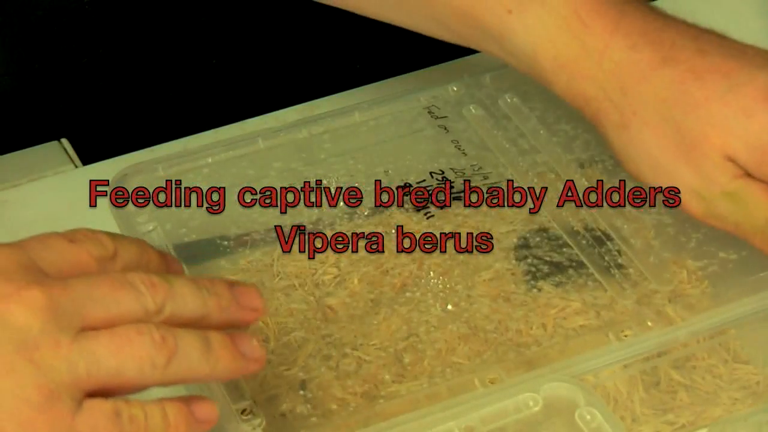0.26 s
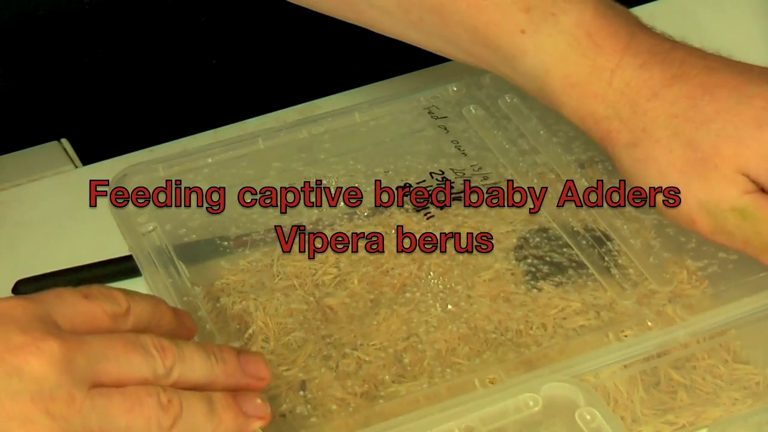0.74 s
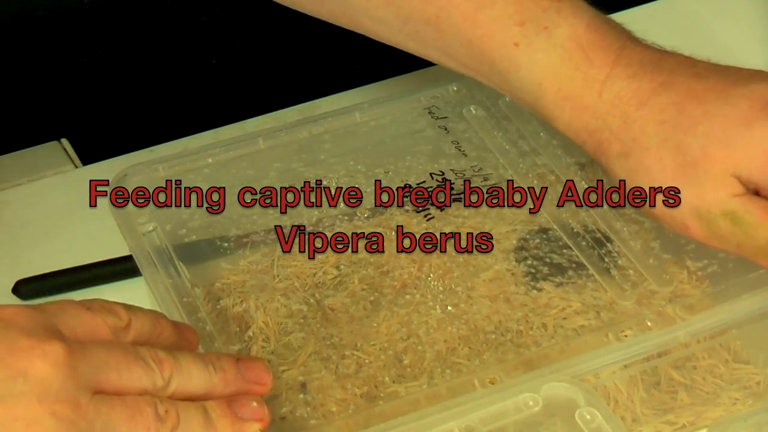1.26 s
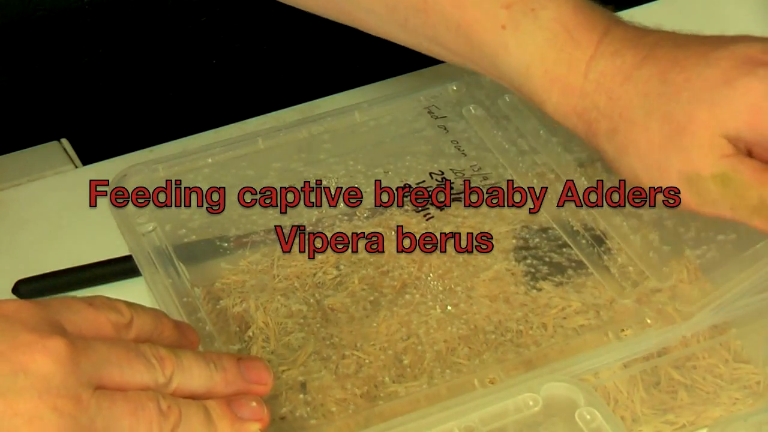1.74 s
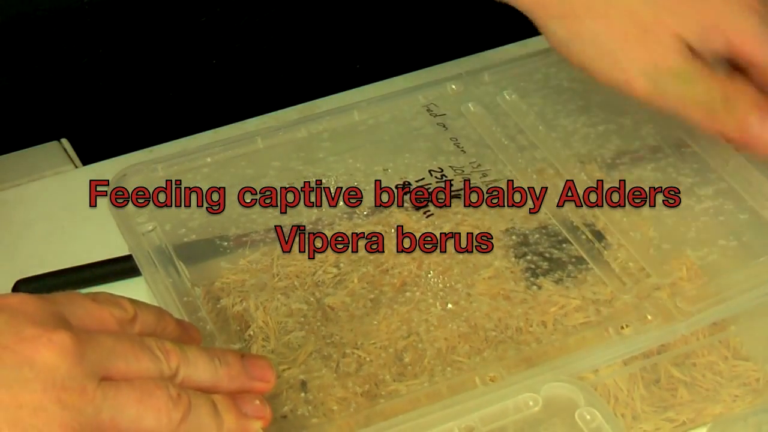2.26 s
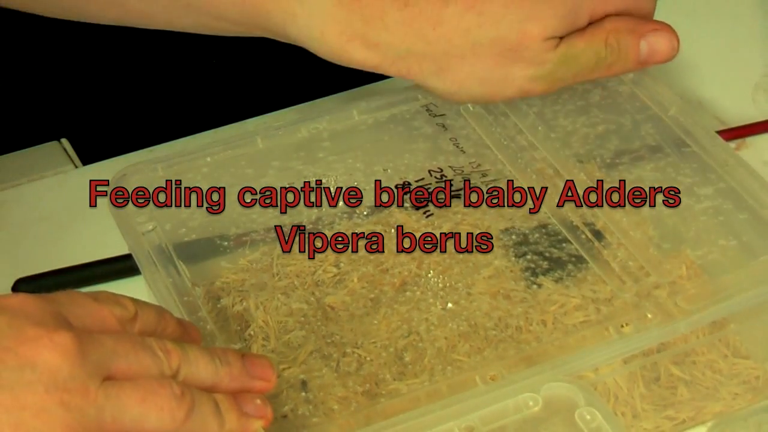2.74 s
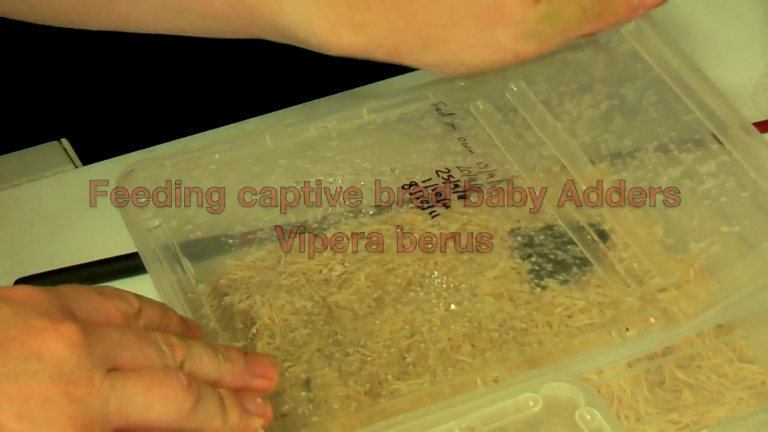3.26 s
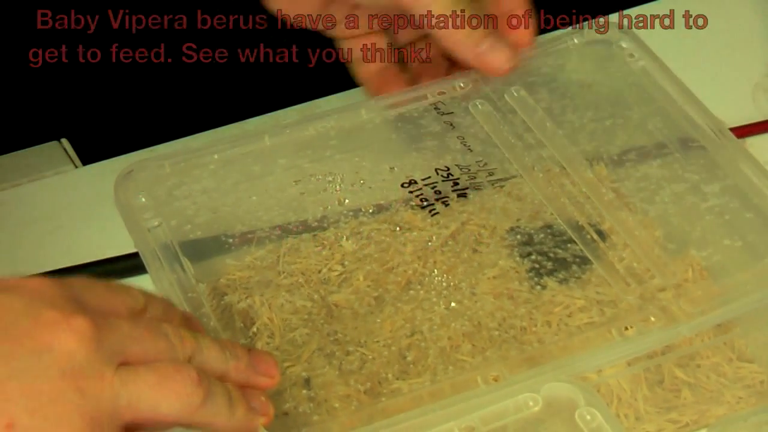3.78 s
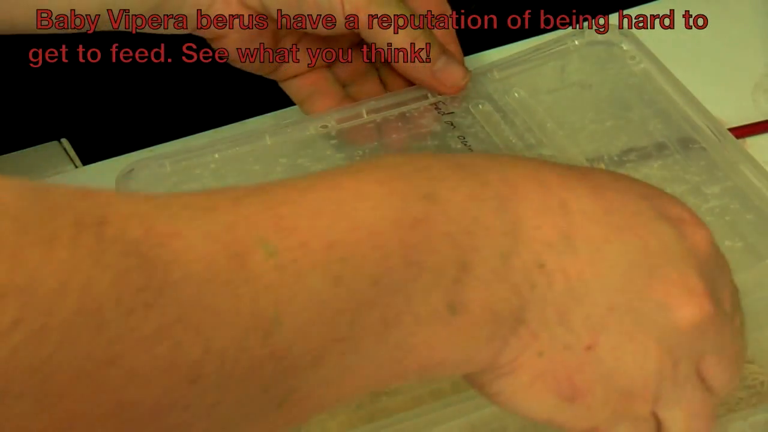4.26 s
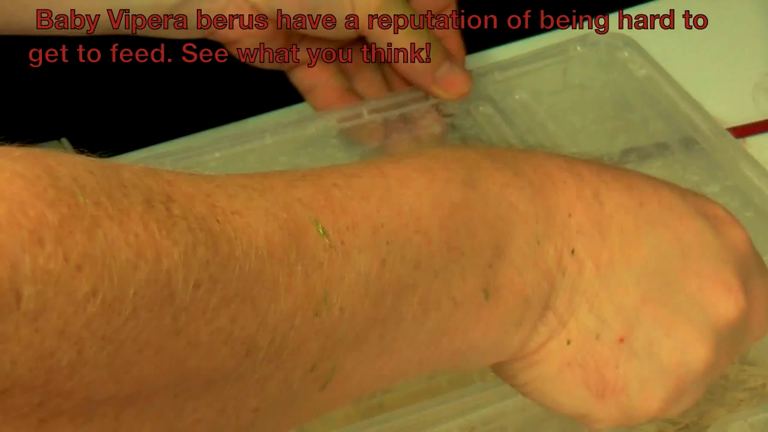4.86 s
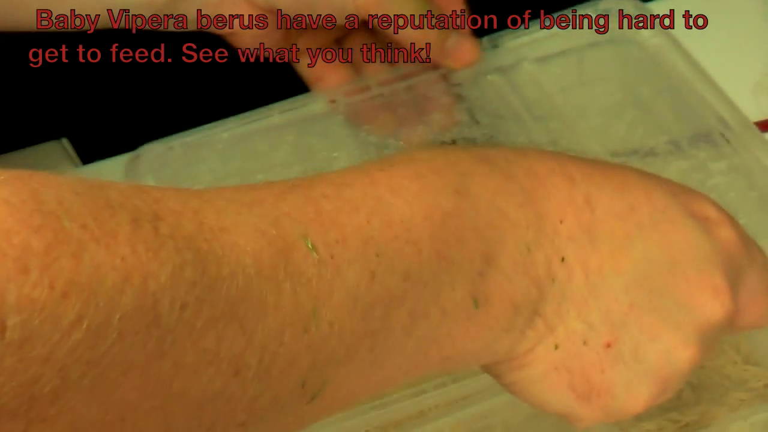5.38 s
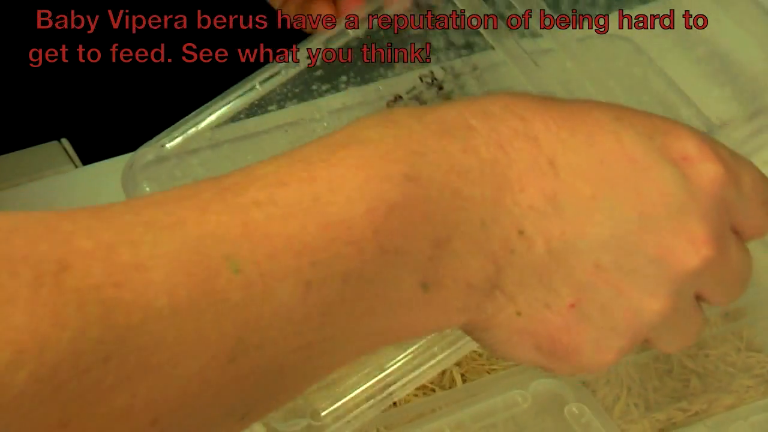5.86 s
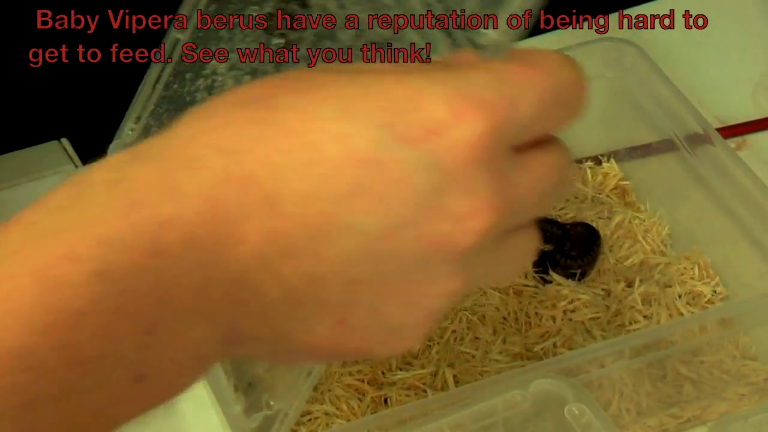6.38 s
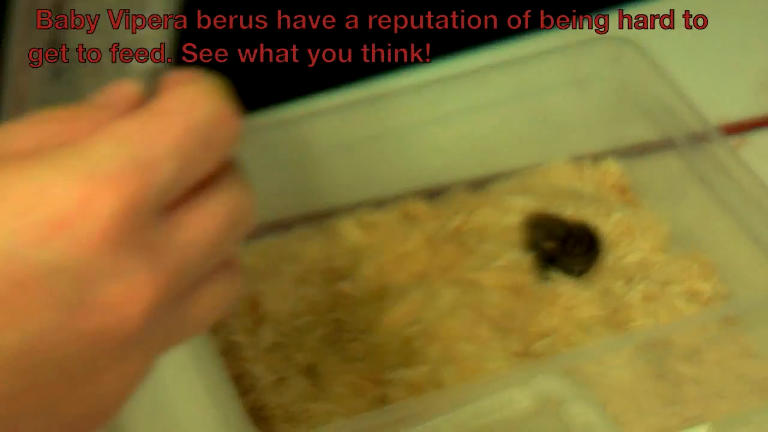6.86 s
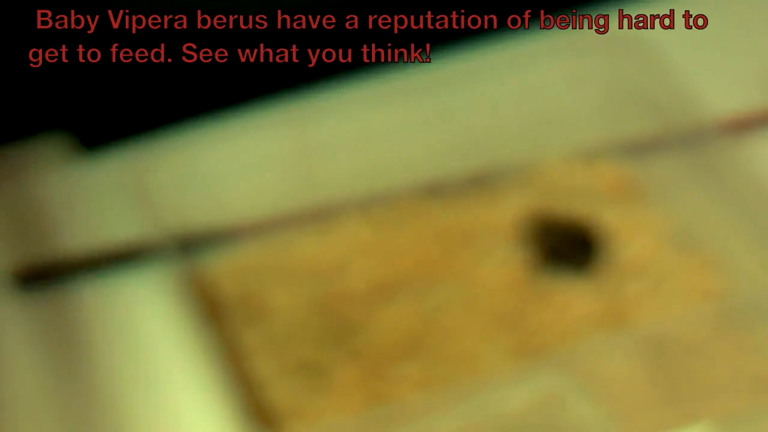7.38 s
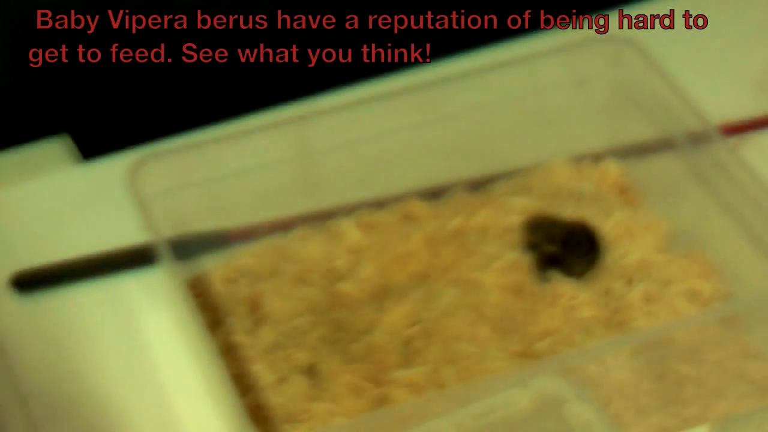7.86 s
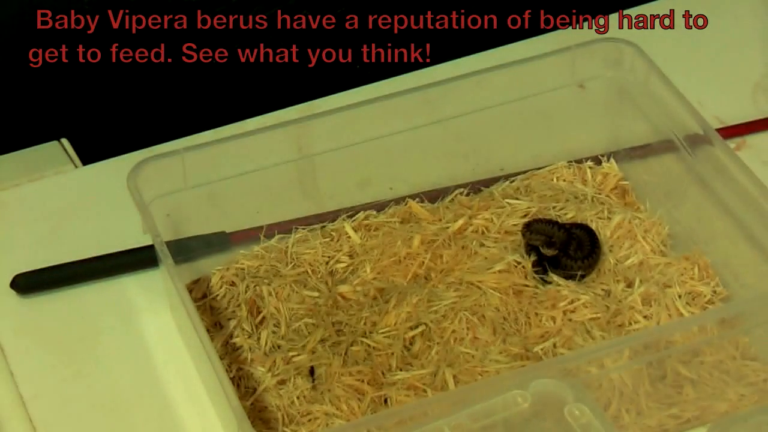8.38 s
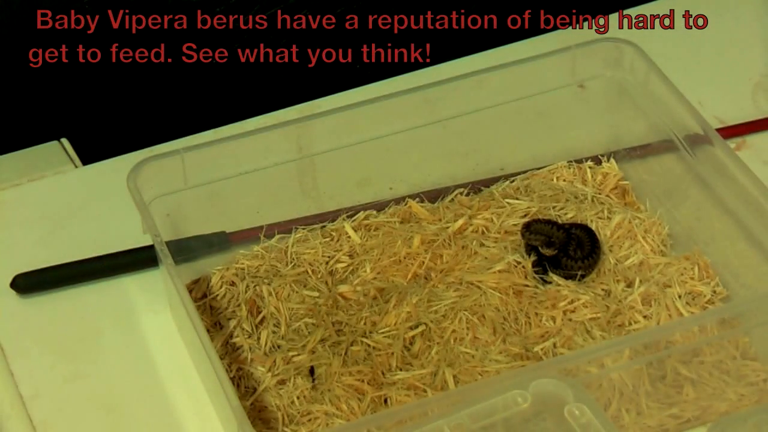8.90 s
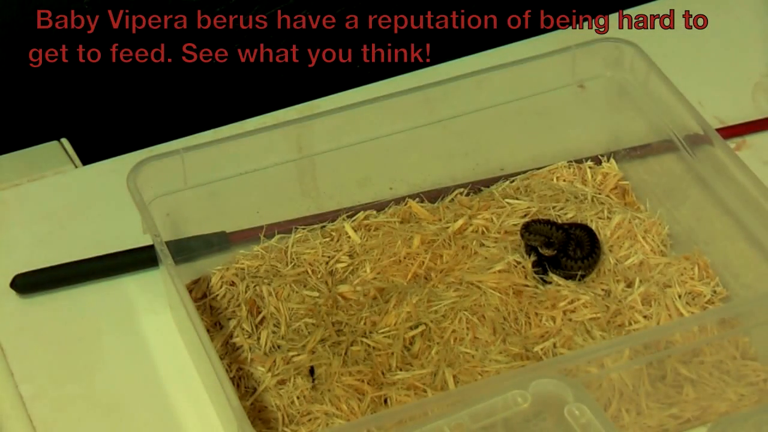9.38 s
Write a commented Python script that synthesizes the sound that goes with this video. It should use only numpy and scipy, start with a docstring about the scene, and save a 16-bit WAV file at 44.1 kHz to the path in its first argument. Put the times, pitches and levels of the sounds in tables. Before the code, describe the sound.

In a small room, a nearby single-channel microphone catches a thin hollow plastic tub over soft fan air with hum, steady hiss, a faint high electrical whine and a small motor whirr that comes and goes. At about 1.1 s a firm hollow knock sounds, followed by clacks near 1.3 s. Lighter bumps and short rubbing scrapes continue from 1.7 to 4 s, with a brighter knock at 2.9 s. Small taps lead to a loud double clack around 5.2 s as the lid loosens, then softer knocks, scrapes and a snap until 6.5 s. From 6.6 to 8.4 s only faint ticks and grazes stand out while the whirr rises. At 8.45 s sharp clacks begin, strongest near 8.7 s, as the lid is set down; from 8.9 s it rocks in quick weakening bumps until about 9.2 s, leaving the background.

```python
"""A catch snaps and a hollow plastic tub knocks: hands work the lid off a thin storage tub in a small room,
lift it away and set it down, where it rocks to rest. Blows ring panel, walls and rim through decaying modes and
shaped noise; fingers and rim scrape as dense tiny slips through the same colours. Near reflections and a short
tail carry the handling. Behind lie fan noise with its hum, a steady hiss that wanders a little in level, a thin
electrical whine, and a faint whirr, as of a lens motor, that comes and goes."""
import sys
import numpy as np
from scipy import signal
from scipy.fft import rfft, irfft
from scipy.io import wavfile
from scipy.ndimage import uniform_filter1d

SR = 44100
rng = np.random.default_rng(int(sys.argv[2]) if len(sys.argv) > 2 else 0)


def int16_out(signal):
    """Quantize to a 16-bit WAV file."""
    q = np.round(np.clip(np.atleast_2d(signal).T, -1, 1) * 32767)
    wavfile.write(sys.argv[1], SR, q.astype(np.int16))


N = 425124
TIME = np.arange(N) / SR  # seconds

# Blows on lid and tub, levels ahead of the handling trim: start_s, thump_db (hollow), clack_db (walls),
# crack_db (sharp edge), thump_hz, clack_hz, square (0 = a glancing swish, 1 = a full crack)
BLOWS = [(.027, -37.5, -52, -63, 443, 1030, 0.34), (1.090, -16.5, -31.5, -38, 470, 1250, .6),
         (1.288, -32, -36.5, -42, 380, 1630, 0.72), (1.32, -28.5, -31.5, -42, 544, 1610, 0.36),
         (1.85, -42, -49.5, -59, 528, 1390, .5), (2.141, -41.5, -41, -56, 415, 1310, .2),
         (2.752, -39.5, -49.5, -61, 510, 1190, 0.35), (2.905, -26.5, -29.5, -33, 412, 1880, 0.16),
         (3.150, -32, -37, -46, 460, 1180, 0), (3.966, -34, -47.5, -63, 426, 1350, .5),
         (4.374, -45, -56, -52, 400, 2800, 0.41), (4.675, -34, -49, -66, 403, 1170, .2),
         (4.727, -42, -56, -75, 255, 1110, .2), (5.144, -19, -36.5, -40.5, 458, 1370, 0.092),
         (5.199, -21, -22, -32.5, 737, 940, 0), (5.206, -17.5, -38, -48, 395, 1410, .3),
         (5.388, -36.5, -39, -47, 480, 3170, 0.089), (5.418, -39, -51, -56, 496, 1430, 0.23),
         (5.486, -39.5, -49.5, -60, 488, 1090, 0), (5.811, -48, -47, -59, 530, 1410, .1),
         (6.028, -31, -40.5, -53, 588, 1070, 0), (6.104, -31, -40.5, -59, 506, 1090, 0.18),
         (6.249, -38.5, -52.5, -62, 496, 1030, 0.22), (6.388, -29.5, -43, -59, 520, 1160, .3),
         (6.444, -32, -30.5, -38.5, 562, 1080, 0.84), (8.450, -26.5, -28, -39, 472, 1390, 0.89),
         (8.613, -33.5, -42, -44.5, 590, 1240, 1), (8.6954, -16, -30, -26.5, 444, 1890, 0.39),
         (8.7542, -19.5, -33, -30, 436, 1310, 0.25), (8.966, -24, -37.5, -57, 446, 840, .2),
         (9.035, -45, -46.5, -51, 463, 2750, 0.83), (9.067, -29.5, -44, -56, 462, 910, 0.42),
         (9.092, -38, -40.5, -53, 395, 990, 0.78)]


def knocks(colours, trim_db=-1):
    """Every snap and bump of lid and tub, each a short contact that excites panel, walls and edge."""
    out = np.zeros(N)
    for row in BLOWS + rocking():
        add(out, row[0], knock(row, colours))
    return amp(trim_db) * out


def knock(row, colours, swing_s=0.0025, lowest_hz=245, ring_db=-21, rattle_db=-10, clack_t60=0.088,
          flex_db=7, flex_q=7, crack_t60=0.042, tick=14.0, chatter_db=-17, hard_s=0.00077):
    """One blow: the panel heaves and rings the tub, while the rim chatters against the walls."""
    # modes of the hollow tub: pitch_hz (each blow detunes it slightly), level_db, t60_s
    tub_modes = [(259, -4, 0.12), (314, -14, 0.25), (380, -14, 0.16), (426.7, -1, 0.12), (461, 2, 0.1),
                 (549, 0.5, 0.31), (676, -4.5, 0.14)]
    # a blow whose crack is as strong as its thump has the briefest contact; duller blows stay longer
    contact_s, duller_db_per_doubling = 0.00045, 16.5
    rebound_s, rebound_db, rebound_pitch = 0.00957, -6, 0.787  # pitch as a share of the first swing's
    lid_free_s, lid_lowest_hz = 7.0, 304  # once off the tub, the lid alone has still less bass

    s, thump_db, clack_db, crack_db, thump_hz, clack_hz, square = row
    hollow, clack, swish, crack = colours
    t = np.arange(SR // 2) / SR
    contact = contact_s * 2 ** ((thump_db - crack_db) / duller_db_per_doubling)
    onset = 1 - np.exp(-(t / contact) ** 2)
    low, mid, high = rng.standard_normal((3, len(t)))

    # the panel swings and springs back once, weaker and lower
    panel = swing(t, thump_hz, swing_s)
    panel = panel + amp(rebound_db) * swing(t - rebound_s, rebound_pitch * thump_hz, swing_s)
    # the tub modes near the panel's pitch ring on
    ring = 0
    for mode_hz, mode_db, t60 in tub_modes:
        detuned_hz = mode_hz * (1 + 0.0097 * rng.standard_normal())
        nearness = 1 / (1 + (np.log(mode_hz / thump_hz) / .5) ** 2)
        ring = ring + amp(mode_db) * nearness * dying(t, t60) * np.sin(2 * np.pi * detuned_hz * t)
    # so small a box radiates hardly any bass
    heave = struck(band(onset * (panel + amp(ring_db) * ring), lowest_hz, "highpass", order=4))
    rattle = struck(through(low * onset * dying(t, 0.16), hollow))
    thump = struck(heave + amp(rattle_db) * rattle)
    if s > lid_free_s:
        thump = struck(band(thump, lid_lowest_hz, "highpass", order=4))

    # the bare tick at the start is strong only for a hard, brief contact
    hardness = 1 / (1 + (contact / hard_s) ** 2)
    snap = (t == 0) * tick * hardness
    walls = through(snap + mid * onset * dying(t, clack_t60), clack)
    walls = struck(flex(walls, clack_hz, flex_db, flex_q))

    # square blows crack across the treble, glancing ones graze with a thin swish
    square = np.clip(square, 0, 1)
    chatter_fade = dying(t, crack_t60) + amp(chatter_db) * dying(t, 0.17)
    chatter = snap + high * onset * chatter_fade
    edge = struck(through(chatter, square * crack + (1 - square) * swish))
    return amp(thump_db) * thump + amp(clack_db) * walls + amp(crack_db) * edge


def swing(t, hz, swing_s):
    """The panel swings up for a few cycles from t = 0 and dies away in two heaving modes."""
    # panel modes: multiple of the thump pitch, level_db, t60_s
    panel_modes = [(1, 1.5, 0.032), (.72, -12.5, 0.038)]
    t = np.maximum(t, 0)
    modes = sum(amp(db) * np.sin(2 * np.pi * k * hz * t) * dying(t, t60) for k, db, t60 in panel_modes)
    return modes * (1 - np.exp(-t / swing_s))


def rocking(count=9):
    """The lid, once set down, rocks to rest in soft bumps that grow weaker and lower."""
    start_s, gap_s, jitter_s = 8.887, 0.034, 0.00293
    first_db, fade_db_per_s = -30.5, 50
    first_hz, sag_hz_per_s = 458, 350
    clack_db, crack_db, clack_hz = -21, -39, 950  # the two levels count from the thump
    since = gap_s * np.arange(count) + jitter_s * rng.standard_normal(count)
    bumps = []
    for t in since:
        db = first_db - fade_db_per_s * t
        hz = first_hz - sag_hz_per_s * t
        bumps.append((start_s + t, db, db + clack_db, db + crack_db, hz, clack_hz, 0))
    return bumps


def scrapes(colours, trim_db=-1, flex_db=8, flex_q=4, lowest_hz=1250, highest_hz=3000):
    """Sliding skin and rim drive the same hollow, walls and edges as the blows."""
    # a stroke that hisses as much as it rasps flexes the wall at rasp_hz; duller strokes flex it lower
    rasp_hz, rasp_db_per_octave = 2450, 11
    rise_share = 0.36  # part of a stroke in which the pressure builds
    hollow, walls, hiss = (unit(through(friction(), c)) for c in colours)
    out = np.zeros(N)
    for s, length, hollow_db, wall_db, hiss_db in strokes():
        near = abs(TIME - s) < 3 * length
        t = TIME[near] - s
        width = length * np.where(t < 0, rise_share, 1 - rise_share)
        pressure = np.exp(-.5 * (t / width) ** 2)
        wall_hz = rasp_hz * 2 ** ((hiss_db - wall_db) / rasp_db_per_octave)
        wall_hz = np.clip(wall_hz, lowest_hz, highest_hz)
        rasp = unit(flex(walls[near], wall_hz, flex_db, flex_q))
        rub = amp(hollow_db) * hollow[near] + amp(wall_db) * rasp + amp(hiss_db) * hiss[near]
        out[near] += pressure * rub
    return amp(trim_db) * out


def strokes():
    """All sliding contacts: scrapes, light ticks and grazes, and the loose lid's buzz after each tabled blow."""
    # skin and rim sliding over the tub, ahead of the trim: peak_s, length_s, hollow_db, wall_db, hiss_db
    slides = [(1.273, .042, -41, -55, -70), (1.36, 0.055, -56, -56, -77),
              (1.675, .075, -37.5, -42.5, -45.5), (2.07, 0.042, -44.5, -54, -51.5),
              (2.18, 0.042, -46, -48.5, -58), (2.54, 0.059, -60, -55, -59), (2.885, .033, -42, -59, -73),
              (3.16, 0.05, -35, -48.5, -43.5), (3.325, 0.13, -49.5, -60, -60.5),
              (3.53, 0.098, -47, -45.5, -60), (3.653, 0.044, -40.5, -39.5, -54),
              (3.74, 0.17, -53, -58, -57), (4.65, 0.026, -41.5, -60, -77), (5.03, 0.27, -49.5, -78, -86),
              (5.728, 0.03, -42, -48.5, -45.5), (5.85, 0.066, -43.5, -54, -80),
              (9.005, 0.055, -41, -43, -62)]
    # light ticks at the rim and fingertip grazes on the lid, nearly all hiss, ahead of the trim:
    # peak_s, length_s, hiss_db
    light_contacts = [(6.087, .01, -47), (6.168, 0.011, -51), (7.207, 0.034, -52.5), (7.709, 0.013, -49),
                      (7.798, 0.038, -51), (7.88, 0.028, -60), (8.054, 0.037, -52)]
    light_hollow_db, light_wall_db = -12, -12  # relative to the hiss
    buzz_delay_s, buzz_length_s = 0.024, 0.057
    # relative to the blow's thump, clack and crack
    buzz_hollow_db, buzz_wall_db, buzz_hiss_db = -24, -18.5, -25.5
    light = [(s, length, db + light_hollow_db, db + light_wall_db, db) for s, length, db in light_contacts]
    buzzes = [(s + buzz_delay_s, buzz_length_s,
               thump + buzz_hollow_db, clack + buzz_wall_db, crack + buzz_hiss_db)
              for s, thump, clack, crack, *_ in BLOWS]
    return slides + light + buzzes


def friction(slips_per_s=1100, spread_db=3.5, smooth=0.66, catch_db=2.0, catch_hz=80):
    """Dense tiny slips of uneven size within a rub that catches and lets go."""
    sizes = amp(spread_db * np.minimum(rng.exponential(1, N), 4))
    slipping = rng.random(N) < slips_per_s / SR
    slips = unit(sizes * rng.choice([-1, 1], N) * slipping)
    return (slips + smooth * rng.standard_normal(N)) * amp(catch_db * drift(catch_hz))


def flex(x, hz, db, q):
    """The spot that is touched favours one flexing resonance of the wall."""
    return x + amp(db) * signal.lfilter(*signal.iirpeak(hz, q, SR), x)


def room(x, wet_db=-9, build_s=0.0083):
    """Two near reflections, and a short tail whose decay time varies with frequency."""
    # decay of the small room: pitch_hz, t60_s
    room_decay = [(150, 0.36), (400, 0.25), (1000, 0.27), (2800, 0.3), (7300, 0.25), (15000, 0.043)]
    # table and near wall: delay_s, gain, dulled above_hz
    reflections = [(.0088, 0.106, 2500), (0.023, 0.32, 1210)]
    t = np.arange(SR * 3 // 4) / SR
    taps = rng.standard_normal(len(t)) * (1 - np.exp(-(t / build_s) ** 2))
    hz, at, z = signal.stft(taps, SR, nperseg=256)
    fades = np.array([dying(at, t60) for t60 in read(room_decay, hz)])
    tail = diffuse(signal.istft(z * fades, SR)[1])
    response = amp(wet_db) * tail / np.linalg.norm(tail)
    for delay, gain, dull_hz in reflections:
        add(response, delay, gain * band(signal.unit_impulse(len(t)), dull_hz, "lowpass", order=1))
    return x + through(x, response)


def diffuse(x, size=70):
    """Evens out the peaks and dips of a response, as many crossing reflections do."""
    z = rfft(x, 2 * len(x))
    smooth_power = abs(uniform_filter1d(abs(z) ** 2, size))
    return irfft(z / np.sqrt(smooth_power + 1e-20))[:len(x)]


def whirr(trim_db=0.5, flutter_db=2.28, flutter_hz=25):
    """A small motor hunts unevenly and rings its housing: noise with resonances, fluttering in level."""
    # colour of the whirr: pitch_hz, level_db (per Hz)
    whirr_colour = [(600, -49), (1080, -11), (1400, -2.5), (2100, 4), (2550, 3.5), (2900, 0.5),
                    (3300, -1.5), (4500, -14.5), (8000, -27.5), (15000, -27)]
    # resonances of the motor: pitch_hz, width_hz, level_db
    motor_modes = [(1390, 25, 12), (1588, 60, 7), (1702, 38, 9.5), (1863, 34, 7), (2060, 35, 6.5),
                   (2182, 21, 9), (2310, 14, 10), (2888, 69, 9)]
    # course of the level ahead of trim and flutter: time_s, level_db
    whirr_course = [(0.0, -63), (0.54, -59), (0.8, -50.5), (1.26, -52.5), (1.45, -55.5), (2.66, -55.5),
                    (3.89, -54), (5.37, -55), (5.5, -61.5), (6.34, -61), (7.52, -53), (8.7, -56),
                    (9.32, -62), (9.64, -62.5)]
    housing = unit(through(rng.standard_normal(N), colour(whirr_colour, motor_modes)))
    course_db = np.interp(TIME, *np.transpose(whirr_course))
    return amp(course_db + trim_db + flutter_db * drift(flutter_hz)) * housing


def whine(hz=9318):
    """A thin electrical tone that swells up to its spells and sinks back after them."""
    # spells in which the whine stands out: start_s, end_s
    spells = [(0, 4.2), (5.9, 6.6)]
    spell_db, rest_db, fade_s = -71, -78, .3
    spell = 0
    for start, end in spells:
        inside_s = np.minimum(TIME - start, end - TIME)
        spell = spell + np.clip(1 + inside_s / fade_s, 0, 1)
    return tone(hz, rest_db + (spell_db - rest_db) * spell)


def background(fan_db=-55, hiss_db=-61.0, level_wander_db=2.7):
    """Fan air as shaped noise with its hum of wavering tones, and a steady hiss that wanders a little in level."""
    # colour of the fan air: pitch_hz, level_db (per Hz)
    fan_colour = [(30, -75), (70, -72), (100, -41), (140, -25.5), (200, -15), (290, -3.5), (420, 0),
                  (620, 2.5), (740, -5), (850, -19), (1400, -39), (4000, -48)]
    # colour of the hiss: pitch_hz, level_db (per Hz)
    hiss_colour = [(400, -39), (1000, -0.5), (1400, 10), (2200, -6.5), (3200, 0.5), (3900, -2.5), (4400, 1),
                   (6500, -5), (8400, -8), (9700, 2), (11500, -2), (14000, -11), (16000, -36)]
    # lasting tones: pitch_hz (centre), level_db (rms)
    hum_tones = [(100, -95), (419, -62), (490, -64.5), (588, -58), (688, -66.5), (4317, -74), (4366, -79.5),
                 (5346, -79), (5457, -87.5)]
    fan, hiss = (unit(through(rng.standard_normal(N), colour(c))) for c in (fan_colour, hiss_colour))
    hum = sum(tone(hz, db) for hz, db in hum_tones)
    return amp(fan_db) * fan + amp(hiss_db + level_wander_db * drift(0.98)) * hiss + hum


def tone(hz, db, waver_hz=3, flutter_db=2.0):
    """A lasting tone that wavers a little in pitch and level."""
    turns = np.cumsum(hz + waver_hz * drift(14.3)) / SR
    return amp(db) * unit(amp(flutter_db * drift(7.5)) * np.sin(2 * np.pi * turns))


def amp(db):
    """Decibels to gain."""
    return 10 ** (np.asarray(db) / 20)


def unit(x):
    """Scales to rms 1."""
    return x / np.sqrt(np.mean(x ** 2) + 1e-20)


def struck(x, size=882):
    """Scales a blow to rms 1 over its first 20 ms."""
    return x / np.sqrt(np.mean(x[:size] ** 2) + 1e-20)


def dying(t, t60):
    """Exponential decay, 60 dB in t60 seconds."""
    return np.exp(-np.log(1000) * t / max(t60, 1e-3))


def read(points, hz):
    """Reads a table on a log-frequency axis."""
    f, value = np.transpose(points)
    return np.interp(np.log(hz + 1), np.log(f + 1), value)


def colour(points, peaks=(), size=8192):
    """Causal (minimum-phase) impulse response of a spectrum with resonances on it."""
    hz = abs(np.fft.fftfreq(size, 1 / SR))
    level = read(points, hz)
    for f, width, db in peaks:
        level = level + db / (1 + (2 * (hz - f) / width) ** 2)
    spectrum = np.exp(np.conj(signal.hilbert(np.log(amp(level)))))
    return np.fft.ifft(spectrum).real[:size // 2]


def through(x, response):
    """Filters x by an impulse response, keeping its length."""
    return signal.fftconvolve(x, response)[:len(x)]


def band(x, hz, kind, order=2):
    """Butterworth filter."""
    return signal.sosfilt(signal.butter(order, hz, kind, fs=SR, output="sos"), x)


def drift(rate_hz, size=4096):
    """Random wandering of rms 1, slower than about rate_hz."""
    hz = np.fft.rfftfreq(size, N / SR / size)
    slow = irfft(rfft(rng.standard_normal(size)) * np.exp(-(hz / rate_hz) ** 2))
    return np.interp(TIME, np.linspace(0, N / SR, size), unit(slow))


def add(mix, s, sound):
    """Mixes a sound in at time s, in seconds."""
    part = mix[max(round(s * SR), 0):][:len(sound)]
    part += sound[:len(part)]


def scene():
    """Tub and lid sound in the room, over the background, whine and whirr."""
    # colour of the hollow tub: pitch_hz, level_db (per Hz)
    hollow_colour = [(30, -49), (110, -34.5), (170, -26.5), (250, -14.5), (380, 2), (560, 1), (700, -7),
                     (900, -18.5), (1600, -50)]
    # colour of the clacking walls: pitch_hz, level_db (per Hz)
    clack_colour = [(60, -40), (300, -48.5), (600, 16.5), (800, 4), (1300, -1.5), (2000, 1), (3000, -1.5),
                    (4000, -9.5), (6000, -13), (12000, -76)]
    # flexing of the thin walls: pitch_hz, width_hz, level_db
    wall_modes = [(1020, 70, 3), (1176, 8.6, 6), (1390, 320, 7.5), (1610, 28, 5.5), (1900, 150, 1.5),
                  (2370, 140, 0.5), (2800, 92, 2), (3310, 30, 6), (3200, 60, -4)]
    # colour of a glancing edge: pitch_hz, level_db (per Hz)
    swish_colour = [(100, -59), (1500, -48), (3000, -13), (4200, -5), (6500, -5), (8300, -7), (10200, 2),
                    (11700, -3), (13500, -10.5), (16000, -28)]
    # colour of a squarely struck edge: pitch_hz, level_db (per Hz)
    crack_colour = [(100, -52), (1000, -48), (2800, 13), (4200, 8.5), (6500, 9), (8300, 1.5), (10000, 9.5),
                    (11500, 1.5), (13500, -12), (16000, -26)]
    hollow, clack = colour(hollow_colour), colour(clack_colour, wall_modes)
    swish, crack = colour(swish_colour), colour(crack_colour)
    handling = knocks((hollow, clack, swish, crack)) + scrapes((hollow, clack, swish))
    return (room(handling) + background() + whine() + whirr())[None]


def record(dry, edge_hz=16100):
    """The recorder's band limit: a steep linear-phase low-pass on the single channel."""
    lowpass = signal.firwin(511, edge_hz, window=("kaiser", 9), fs=SR)
    return signal.oaconvolve(dry, lowpass[None], "same")


dry = scene()
out = record(dry)
int16_out(out)
```